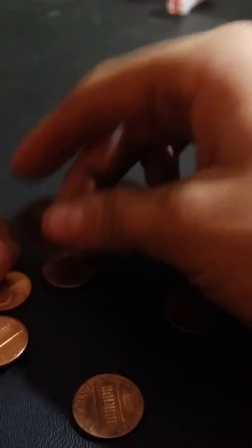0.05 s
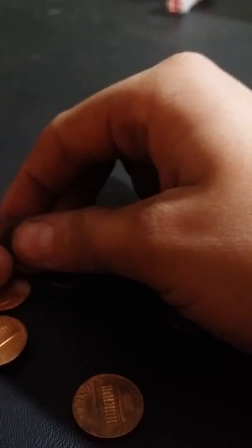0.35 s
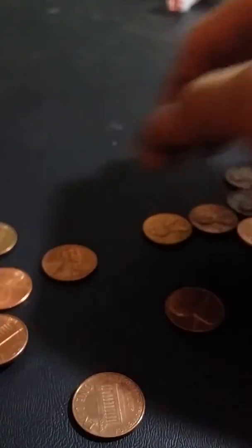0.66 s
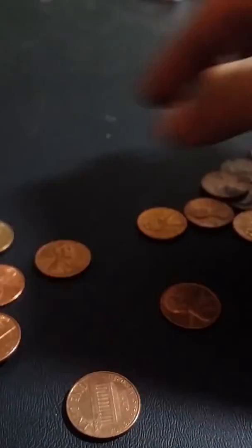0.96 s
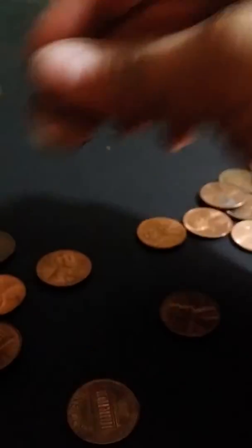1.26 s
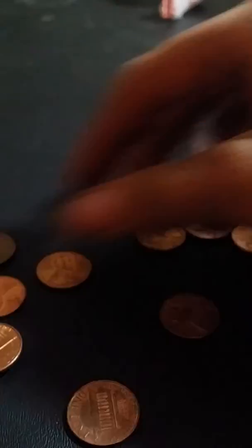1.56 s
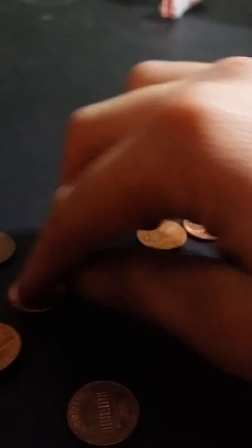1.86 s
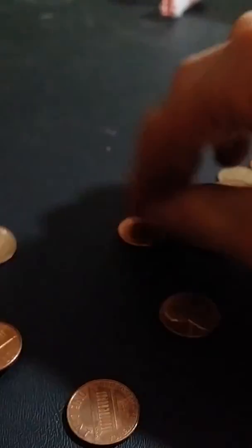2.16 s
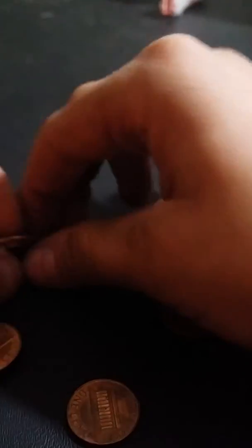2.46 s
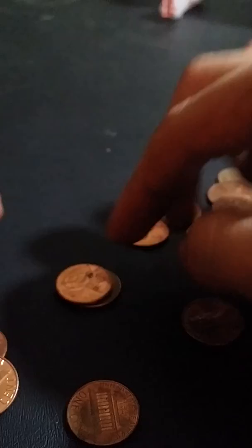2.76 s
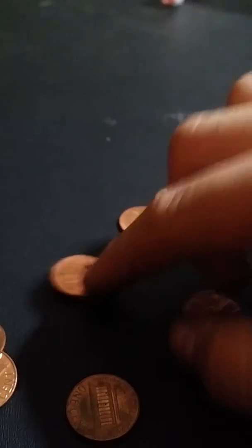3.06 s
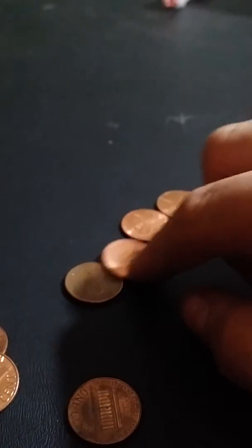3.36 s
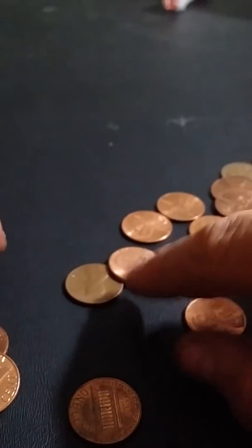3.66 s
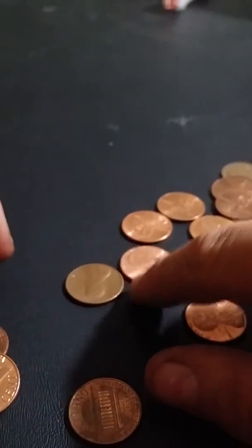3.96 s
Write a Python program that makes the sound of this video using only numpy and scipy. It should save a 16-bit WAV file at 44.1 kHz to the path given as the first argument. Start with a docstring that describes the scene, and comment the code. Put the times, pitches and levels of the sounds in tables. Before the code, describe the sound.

Close up in a quiet room, coins are set down on a table with sharp ticks and brief high rings. Soft sliding and hand rubbing lead to a louder clinking flurry, lighter clicks and a final thump.

```python
"""Coins are picked up, slid and set down on a hard table, close by in a quiet room.
First fingers thump the table and coins click down and chatter, each contact a sharp tick with a short,
very high ring. After another click at 1.4 s, a hand rubs over the table, pushing the coins about.
Near 2.6 s comes the loudest click, with a thump and a flurry of ringing. A few lighter clicks and some
soft sliding follow, and one last thump ends it."""
import sys
import numpy as np
from scipy import signal
from scipy.io import wavfile

SR = 44100
rng = np.random.default_rng(int(sys.argv[2]) if len(sys.argv) > 2 else 0)


def log_audio(samples):
    """Write samples as a 16-bit WAV file to the path given in sys.argv[1]."""
    # one column per channel
    frames = np.atleast_2d(samples).T
    # limit to full scale, then quantise
    limited = np.clip(frames, -1, 1)
    pcm = np.round(limited * 32767).astype(np.int16)
    wavfile.write(sys.argv[1], SR, pcm)


N = 176400


def amp(db):
    """Turns decibels into a gain."""
    return 10 ** (np.asarray(db) / 20)


def evened(x):
    """Scales a sound to an average power of 1."""
    return x / np.sqrt(np.mean(x ** 2) + 1e-20)


def fade(t, fade_s):
    """A gain that falls by 60 dB in fade_s seconds."""
    return np.exp(-np.log(1000) * t / fade_s)


def add(mix, start_s, sound):
    """Mixes a sound in at its start time."""
    part = mix[..., max(round(start_s * SR), 0):][..., :sound.shape[-1]]
    part += sound[..., :part.shape[-1]]


def through(x, response):
    """Filters each side: every sample sets off a copy of the response."""
    return signal.fftconvolve(np.atleast_2d(x), np.atleast_2d(response), axes=1)[:, :x.shape[-1]]


def colour(table, size=4096):
    """Turns a table of levels by pitch into filter responses, one for each level column."""
    hz, *sides = np.transpose(table)
    log_hz = np.log(abs(np.fft.fftfreq(size, 1 / SR)) + 1)
    log_gain = np.log(amp([np.interp(log_hz, np.log(hz), side) for side in sides]))
    spectrum = np.exp(np.conj(signal.hilbert(log_gain)))  # nothing sounds before the hit
    response = np.fft.ifft(spectrum).real[:, :size // 2]
    return evened(response) / np.sqrt(size // 2)


def echoes(fade_s, size):
    """A dying blur of echoes, different on each side."""
    t = np.arange(size) / SR
    return evened(rng.standard_normal((2, size)) * fade(t, fade_s)) / np.sqrt(size)


def grains(size, per_s, spread_db):
    """Random tiny impacts, a few much larger than the rest."""
    chance, strength, sign = rng.random((3, size))
    gain = amp(spread_db * np.minimum(-np.log(1 - strength), 4))
    return evened((chance < per_s / SR) * gain * np.sign(sign - .5))


# Tone of the quiet room: pitch_hz, level_db
ROOM_COLOUR = [(20, -26), (60, 5.5), (120, 9.5), (300, 2), (1000, -16.5), (2500, -11), (4500, -12.5),
               (6700, -9), (10000, -16.5), (15300, -14.5)]
def room_tone():
    """A faint, steady rumble and hiss."""
    return amp(-58.5) * through(rng.standard_normal((2, N)), colour(ROOM_COLOUR))


def room_echo(sound, dull_hz=7150):
    """A small room sends the sound back briefly and soaks up the treble."""
    walls = signal.lfilter(*signal.butter(1, dull_hz, fs=SR), echoes(fade_s=.13, size=22000))
    return amp(-7) * through(sound, walls)


# How loudly the hand rubs: time_s, level_db
RUB_LEVELS = [(0, -39.5), (0.041, -46), (.07, -60), (.13, -69.5), (.27, -62), (0.359, -52), (.45, -68),
              (.64, -59.5), (.76, -46), (.86, -55.5), (1.02, -60), (1.122, -45.5), (1.21, -52), (1.31, -48),
              (1.442, -41), (1.512, -57.5), (1.6, -45), (1.7, -38), (1.8, -45.5), (1.9, -46.5),
              (2.06, -42.5), (2.2, -54.5), (2.3, -48.5), (2.46, -46.5), (2.522, -32.5), (2.598, -40),
              (2.679, -52), (2.765, -39.5), (2.9, -52), (3.09, -58.5), (3.17, -47), (3.33, -50.5),
              (3.43, -49), (3.7, -66), (4, -66.5)]
# Tone of skin on the table: pitch_hz, left_db, right_db
SKIN_COLOUR = [(25.4, -52, -48), (58, -3, 5.5), (97, 3.5, 10), (225, -10.5, 6), (324, -8.5, 3.5),
               (502, -7.5, 5.5), (1250, -25.5, -3), (1960, -19.5, -2), (3350, -12, -10), (4600, -21, -22),
               (6300, -16, -17.5), (8220, -18.5, -4.5), (9630, -24, -13.5), (12000, -40, -12),
               (15200, -17, -20)]
def hand_rub(catch_share=.65, wobble_s=.009, wobble_db=2):
    """Skin drags with uneven pressure: a fine grain on each side, and coarser catches shared by both."""
    t = np.arange(N) / SR
    fine = np.array([grains(N, per_s=6000, spread_db=2) for side in range(2)])
    catches = grains(N, per_s=750, spread_db=3.4)
    friction = np.sqrt(1 - catch_share ** 2) * fine + catch_share * catches
    level = amp(np.interp(t, *np.transpose(RUB_LEVELS)))
    wobble = rng.standard_normal(N // 20)
    pressure = amp(wobble_db * np.interp(t / wobble_s, np.arange(len(wobble)), wobble))
    return through(friction * level * pressure, colour(SKIN_COLOUR))


# Blows on the table top: start_s, level_db, contact_ms
TABLE_BLOWS = [(0.304, -29, 4.9), (0.334, -37, 0.8), (0.554, -27.5, 3), (.725, -31, 0.48),
               (0.751, -37.5, 1.1), (0.781, -31, 1.6), (0.803, -34, 1.2), (0.844, -37.5, 1.2),
               (1.033, -37.5, 2.2), (1.383, -32, 7.6), (2.491, -23, 16), (2.531, -31.5, 9.9),
               (2.596, -15, 0.85), (2.614, -29.5, 3.2), (3.01, -33.5, 15), (3.131, -34, 2.1),
               (3.175, -35.5, 2.4), (3.25, -35.5, 1.7), (3.751, -41, 0.71), (3.838, -21, 0.72)]
# The table top's own low notes: pitch_hz, level_db, fade_s
TABLE_NOTES = [(108, 1, .12), (141, 1, .11), (180, 2.5, .12), (224.7, 2, .06), (305, -3, .11),
               (355, -1, .06), (447, -5.5, .06), (590, -4, .031)]
def table_thumps(detune=.03, left_db=-10):
    """Fingers and coins push on the table top; a longer contact gives a duller thump."""
    out, t = np.zeros(N), np.arange(14000) / SR
    for start_s, level_db, contact_ms in TABLE_BLOWS:
        body = 0
        for k, (hz, note_db, fade_s) in enumerate(TABLE_NOTES):
            pitch_hz = hz * (1 + detune * rng.normal())
            body += (-1) ** k * amp(note_db) * fade(t, fade_s) * np.sin(2 * np.pi * pitch_hz * t)
        progress = 2 * np.pi * t * 1000 / contact_ms
        push = progress * np.exp(-progress)
        thump = through(body, push)[0]
        add(out, start_s, amp(level_db + .5) * thump / abs(thump).max())
    return out * amp([[left_db], [0]])


# A coin's edge catching on the table: start_s, level_db
EDGE_CATCHES = [(1.3815, -19), (1.6993, -18), (2.597, -17)]
def edge_knocks(band_hz=(300, 2600), left_db=-10):
    """A catching edge draws a short, hollow knock from the table, nearer the right side."""
    out = np.zeros((2, N))
    band = signal.butter(2, band_hz, "band", fs=SR, output="sos")
    for start_s, level_db in EDGE_CATCHES:
        knock = signal.sosfilt(band, echoes(fade_s=.012, size=2000))
        add(out, start_s, 10 * amp(level_db) * knock)
    return out * amp([[left_db], [0]])


# Coins sliding on the table: start_s, length_s, level_db
COIN_SLIDES = [(-.02, 0.086, -57), (1.588, 0.23, -51.5), (1.91, 0.2, -50.5), (2.165, 0.37, -49.5),
               (2.486, 0.15, -50.5), (2.698, 0.34, -58), (3.219, 0.27, -54.5), (3.439, 0.26, -56)]
# Tone of their scraping: pitch_hz, left_db, right_db
SLIDE_COLOUR = [(200, -2, -8), (1240, -9, -15), (2670, 0, 2), (4650, -0.5, -2), (6640, 5, -8),
                (8400, -8.5, -7), (10700, -5, -14), (13600, -9, -0.5), (15200, -8, -30)]
def coin_slides(rise_s=.019, fall_s=.087):
    """Sliding coins catch on the fine grain of the table."""
    out, t = np.zeros((2, N)), np.arange(SR // 2) / SR
    for start_s, length_s, level_db in COIN_SLIDES:
        push = np.clip(np.minimum(t / rise_s, (length_s - t) / fall_s), 0, 1)
        scrape = np.array([grains(len(t), per_s=4500, spread_db=3.5) for side in range(2)])
        add(out, start_s, amp(level_db) * push * scrape)
    return through(out, colour(SLIDE_COLOUR))


# The high notes of a free coin: pitch_hz, level_db, fade_s
COIN_NOTES = [(12120, -4, .04), (12520, -4, .025), (12960, 0, .05), (13300, -3, .02), (13800, -8, .018),
              (14500, -9, .015), (15150, -13, .025)]
# How loosely the coins lie: time_s, looseness (0 gripped, 1 free)
LOOSENESS = [(.9, .4), (1.38, .9), (2.68, 1), (3.02, .35)]
def coin_ring(start_s, detune=.005, right_db=-5.5, size=5000):
    """A struck coin rings; a gripped one rings shorter and further off pitch."""
    t, out = np.arange(size) / SR, 0
    looseness = np.interp(start_s, *np.transpose(LOOSENESS))
    for hz, level_db, fade_s in COIN_NOTES:
        pitch_hz = hz * (1 + detune / looseness * rng.normal())
        turns = pitch_hz * t + rng.random((2, 1))
        out += amp(level_db) * fade(t, fade_s * looseness) * np.sin(2 * np.pi * turns)
    return 2 * evened(out) / np.sqrt(size) * amp([[0], [right_db]])


# Tone of a coin's tick: pitch_hz, left_db, right_db
TICK_COLOUR = [(100, 1, -12), (535, -12, -9), (1250, -12, -14), (2640, -2, 0.5), (3970, 3.5, -27.5),
               (4260, -3, -6.5), (6400, 3.5, -16), (7600, -1, -6), (10600, -4, -8), (13600, -8, -14),
               (15300, -10.5, -24.5)]
def coin_tick(right_lag_s=.00044):
    """A sharp tick reaches the left side first and scatters off hand and table."""
    paths = amp(1) * echoes(fade_s=.019, size=5000)
    paths[0, 0] += 1  # the straight path to each side
    paths[1, round(right_lag_s * SR)] += .96
    return through(paths, colour(TICK_COLOUR))


# Coins rattling on each other: start_s, length_s, level_db, change_db (by the end), ring_db
CHATTER_BURSTS = [(0.336, 0.099, -43.5, -16.5, -8), (0.663, 0.053, -51, -3, -14),
                  (0.73, 0.11, -39.5, -9, 3), (0.886, 0.086, -40.5, -30, -4), (1.379, 0.069, -43, -4.5, 3),
                  (1.625, 0.14, -50, 3.5, -3.5), (1.931, 0.021, -44, -4.5, 0.5),
                  (2.496, 0.13, -44.5, 0.5, -4), (2.646, 0.06, -37.5, -11.5, -8),
                  (3.026, 0.037, -49, -1, -3), (3.123, 0.067, -46, 2, -3.5)]
def coin_chatter(coins=4):
    """Bursts of tiny contacts keep a few coins ringing, each at its own pitch."""
    out, t = np.zeros((2, N)), np.arange(SR // 4) / SR
    for start_s, length_s, level_db, change_db, ring_db in CHATTER_BURSTS:
        level = (t < length_s) * amp(level_db + change_db * np.minimum(t / length_s, 1))
        for coin in range(coins):
            hits = level * grains(len(t), per_s=400, spread_db=5)
            contact = coin_tick() + amp(ring_db) * coin_ring(start_s)
            add(out, start_s, through(hits, contact) / np.sqrt(2 * coins))
    return out


def coin_bounces(longest_gap_s=.003, bounce_gain=.42):
    """A coin lands, then touches twice more, each time sooner and softer."""
    out = np.zeros(round(2 * longest_gap_s * SR) + 1)
    gaps = rng.uniform(.63, 1, 2) * longest_gap_s * SR * [1, .5]
    touches = np.r_[0, np.cumsum(gaps)].astype(int)
    out[touches] = bounce_gain ** np.arange(3)
    return out / np.linalg.norm(out)


# Single coin contacts: start_s, level_db, ring_db (extra level for the ring alone)
COIN_CONTACTS = [(0.173, -31, -13), (0.3, -34.5, -23), (.335, -15.5, -2.5), (.346, -30, 3),
                 (0.675, -30.5, -10), (0.7017, -31.5, -17), (.7243, -13, -23), (0.7248, -21, -6),
                 (.7405, -20, -2), (0.752, -17, 1), (.7825, -25.5, -3), (0.806, -19.5, -2),
                 (0.828, -28, -6), (0.8934, -22, -1), (.911, -25, -6), (.955, -33, -7), (1.3533, -36, -16),
                 (1.3812, -13, -6), (1.4, -20, -5), (1.406, -27, 3), (1.551, -22, -20), (1.577, -26.5, -6),
                 (1.697, -23.5, -6), (2.0514, -26, -5), (2.087, -26.5, -7), (2.29, -26, 0),
                 (2.573, -21.5, -1), (2.5875, -32, 14), (2.5965, -8, -16), (2.5977, -18, 8),
                 (2.621, -27.5, 14), (2.6506, -18.5, 4), (2.657, -28, 11), (2.677, -17, -1),
                 (2.682, -22.5, 7), (3.0159, -27.5, -2), (3.052, -28, -2.5), (3.1275, -19.5, -12),
                 (3.1755, -19, -11), (3.7238, -40.5, -17), (3.748, -28, -22), (3.8384, -28.5, -27)]
def coin_clicks():
    """Each contact gives a bouncing tick and sets the coin ringing."""
    out = np.zeros((2, N))
    for start_s, level_db, ring_db in COIN_CONTACTS:
        tick = amp(5) * through(coin_tick(), coin_bounces())
        ring = amp(7.5 + ring_db) * coin_ring(start_s)
        add(out, start_s, amp(level_db) * (tick + ring))
    return out


def scene():
    """Room tone and the rubbing hand lie under the table and coins, which echo in the room."""
    contacts = table_thumps() + edge_knocks() + coin_slides() + coin_chatter() + coin_clicks()
    return room_tone() + hand_rub() + room_echo(contacts) + contacts


def record(dry):
    """Trims the deep bass below 70 Hz and the highest treble above 15750 Hz."""
    low_cut = signal.butter(2, 70, "high", fs=SR, output="sos")
    high_cut = signal.firwin(161, 15750, window=("kaiser", 9), fs=SR)
    return signal.oaconvolve(signal.sosfilt(low_cut, dry), high_cut[None], "same")


dry = scene()
out = record(dry)
log_audio(out)
```